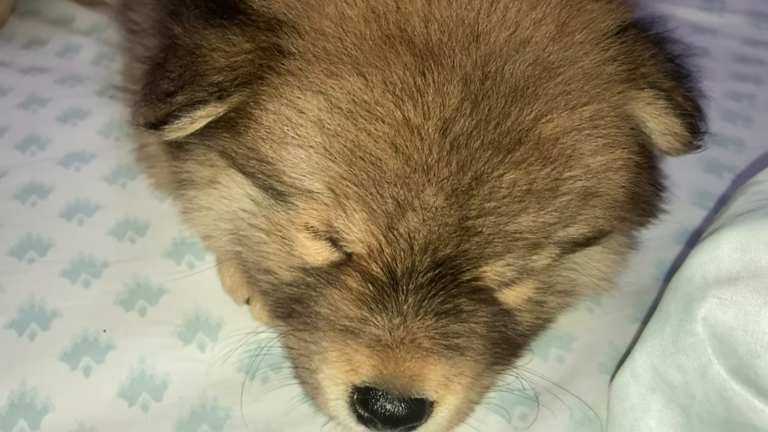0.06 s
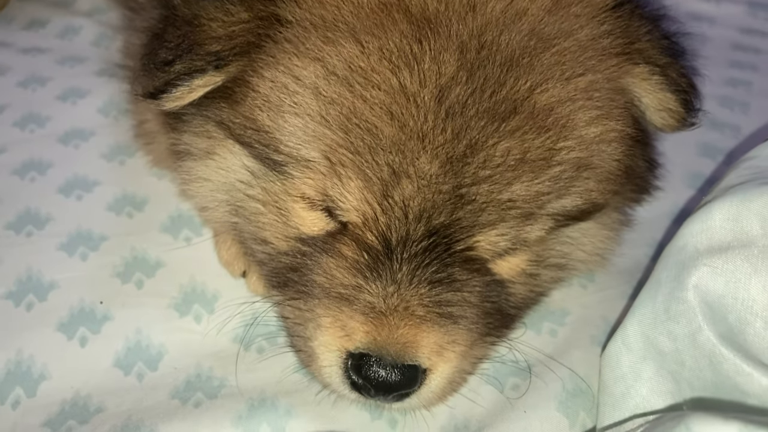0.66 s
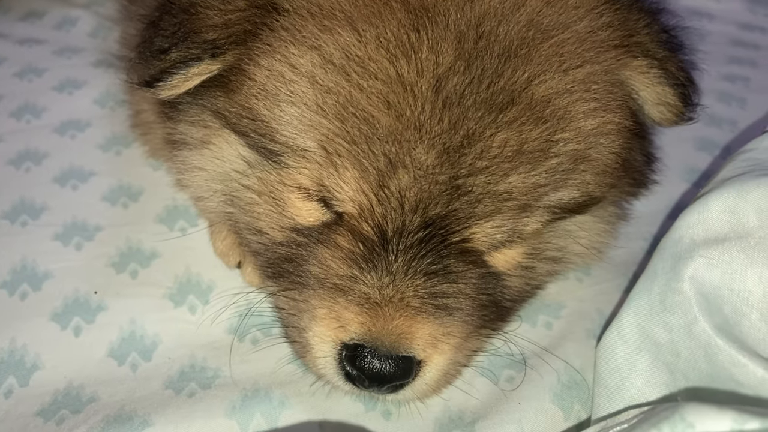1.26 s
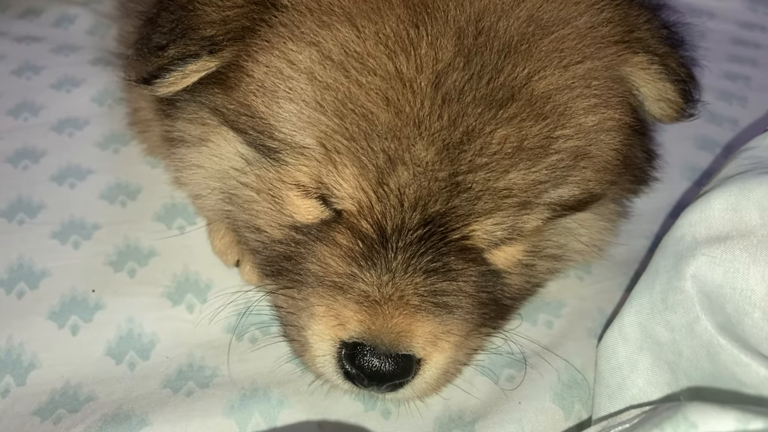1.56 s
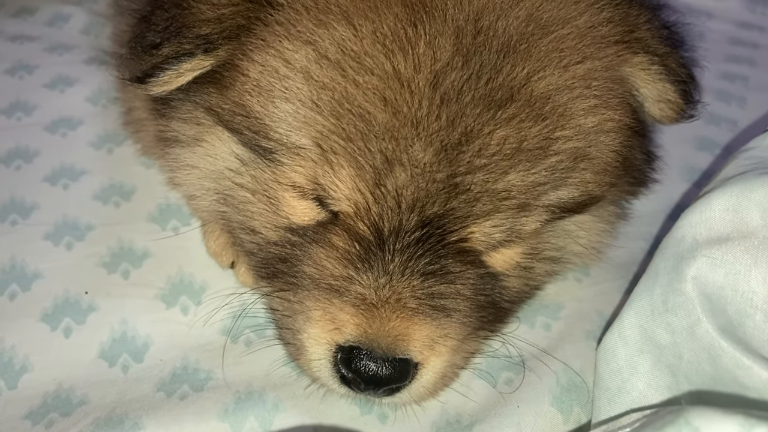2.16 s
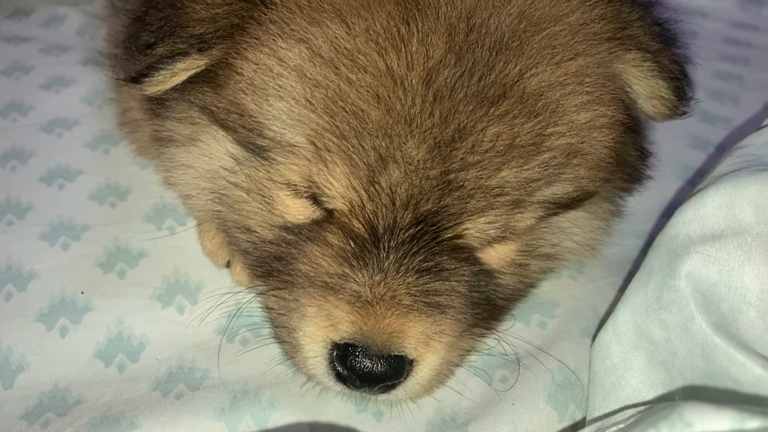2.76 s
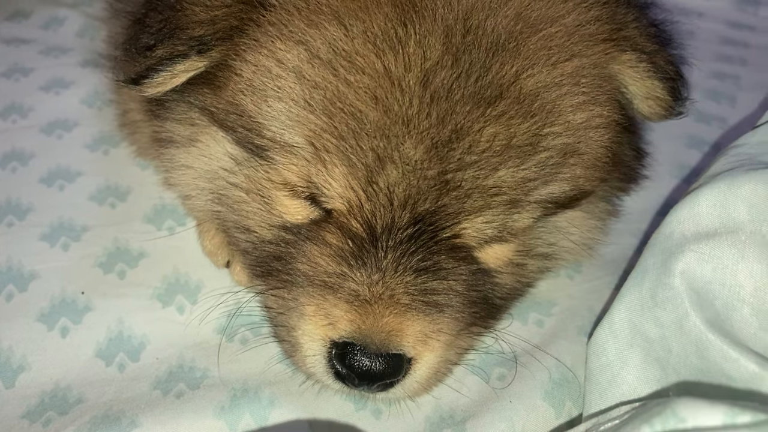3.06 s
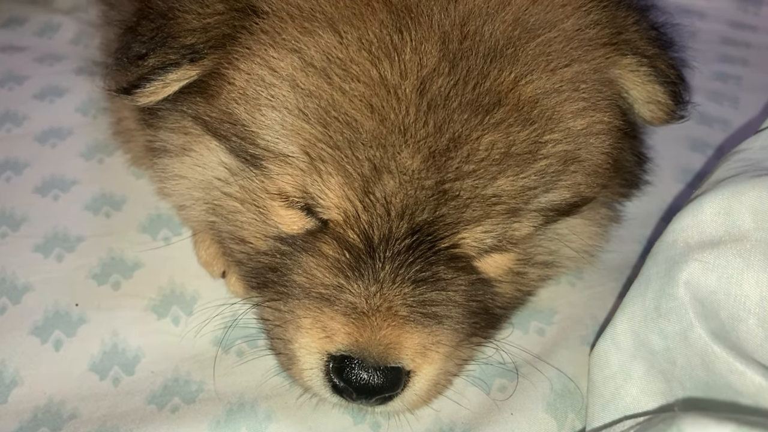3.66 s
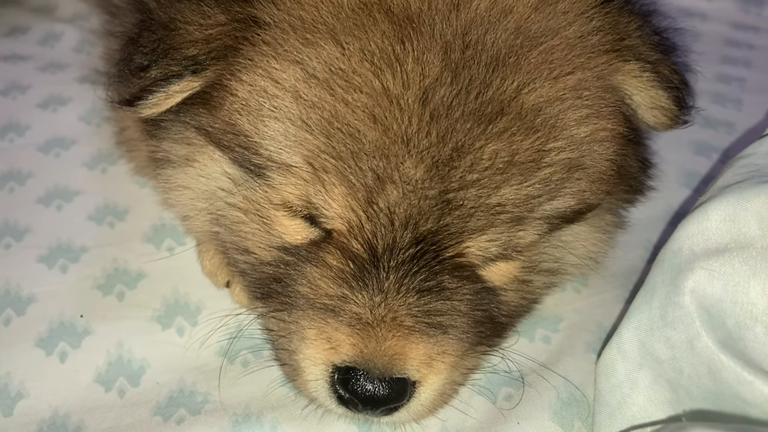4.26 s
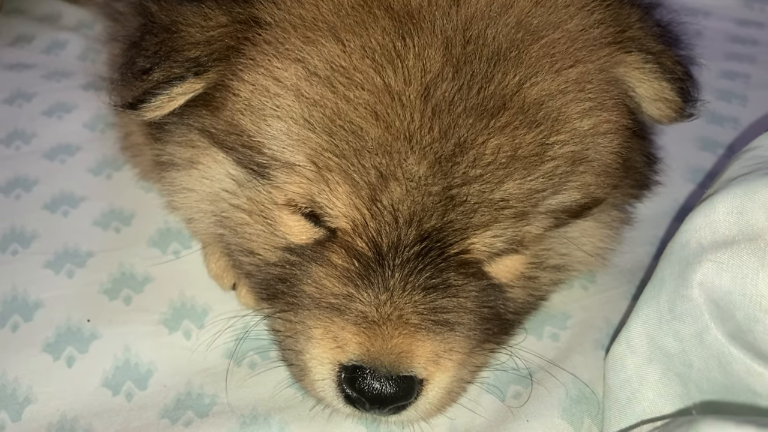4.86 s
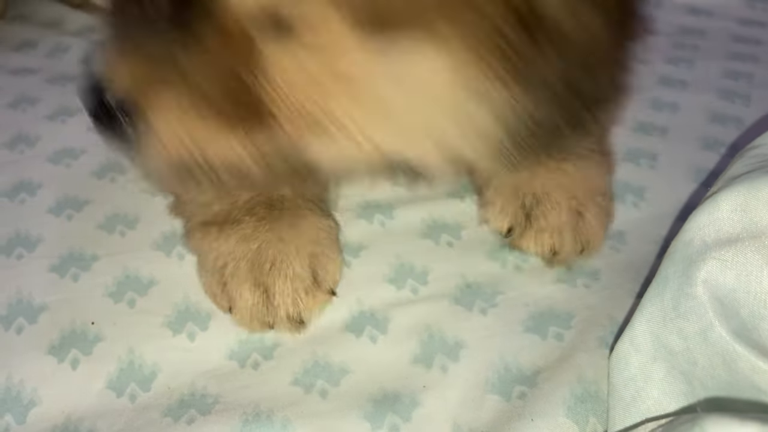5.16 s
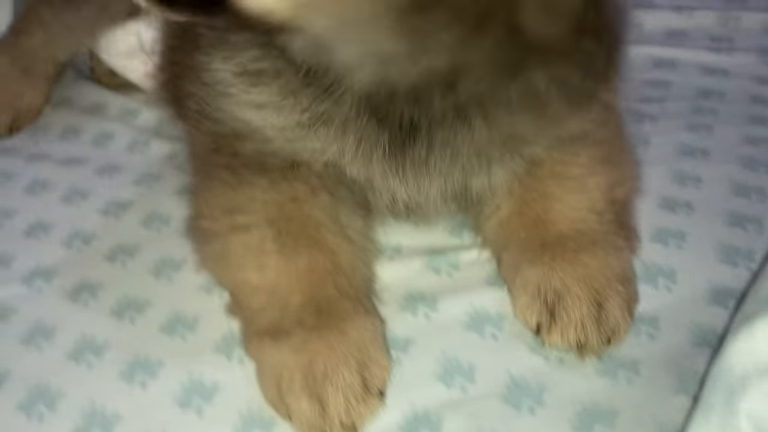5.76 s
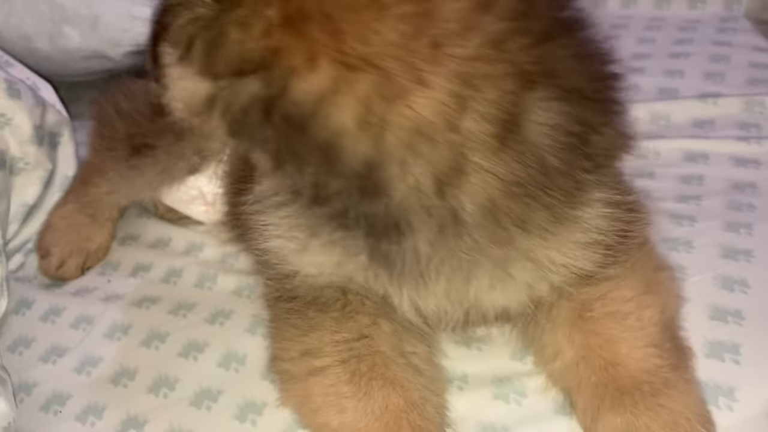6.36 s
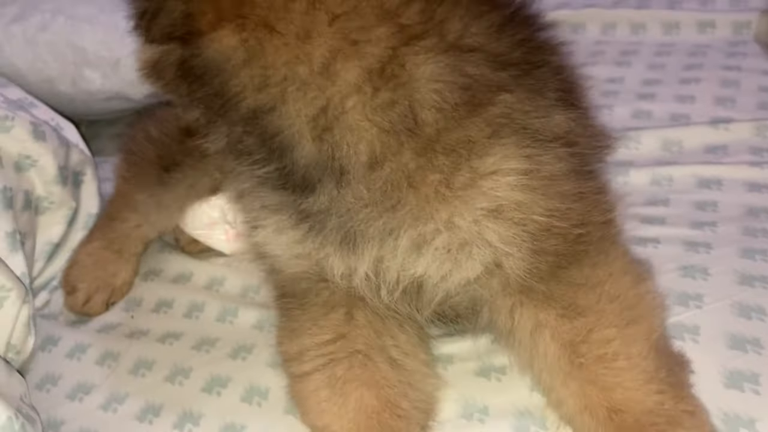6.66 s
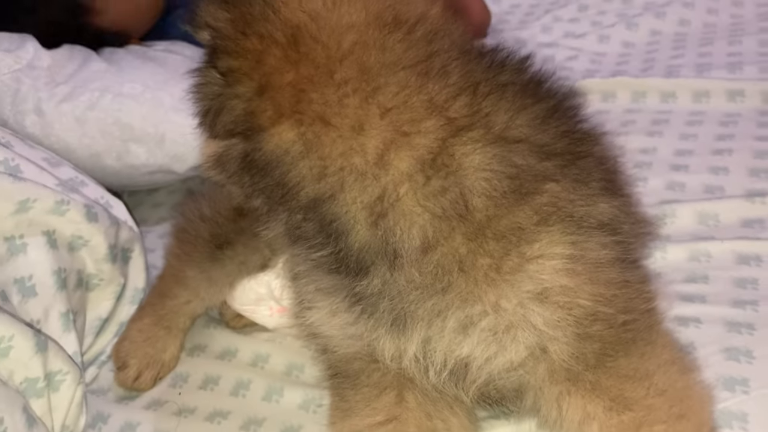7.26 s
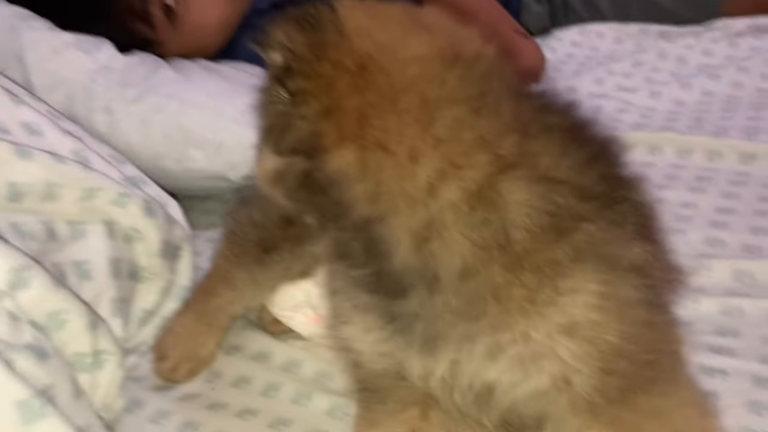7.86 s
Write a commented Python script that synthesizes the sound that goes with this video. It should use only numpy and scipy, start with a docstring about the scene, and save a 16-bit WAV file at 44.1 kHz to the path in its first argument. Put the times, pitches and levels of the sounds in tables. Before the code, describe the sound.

An air conditioner drones low and hisses evenly in a quiet bedroom, with faint ticks, soft bedding rustle and one small click.

```python
"""Air conditioner in a quiet bedroom

Heard from the bed, on a camera's stereo microphone. The compressor turns a little slower than the
mains, so its drone throbs six times a second; the fan adds rumble and even hiss. Faint wet ticks
(perhaps condensate) and one dry click sound over it. Bedding rustles, the camera takes a soft bump
and two dull knocks, and the hiss changes colour as the camera turns."""
import sys
import numpy as np
from scipy import signal
from scipy.fft import rfft, irfft, next_fast_len
from scipy.io import wavfile
from scipy.ndimage import uniform_filter1d, map_coordinates

SR = 44100
rng = np.random.default_rng(int(sys.argv[2]) if len(sys.argv) > 2 else 0)


def bounce(signal):
    """Save signal as a 16-bit WAV file at the path given by the first command-line argument."""
    frames = np.transpose(np.atleast_2d(signal))
    limited = np.clip(frames, -1, 1)
    pcm = np.round(limited * 32767).astype(np.int16)
    wavfile.write(sys.argv[1], SR, pcm)


N = 349227


# The compressor's drone, from the bed: shaft_multiple, mains_multiple, level_db
DRONE_LINES = [(2, 0, -49), (0, 2, -51.5), (3, 0, -48), (1, 2, -42.5), (4, 0, -59.5), (2, 2, -62.5),
               (0, 4, -52.5), (11, 0, -71), (12, 0, -71), (13, 0, -71), (14, 0, -66.5), (15, 0, -74),
               (16, 0, -71.5), (21, 0, -72.5), (27, 0, -74), (28, 0, -78)]
# The casing's once-a-turn shake: time_s, level_db
CASING_SHAKE = [(0.0, -42.5), (0.42, -40.5), (0.77, -44), (1.26, -40), (1.61, -45.5), (2.31, -40),
                (2.8, -49.5), (3.15, -42.5), (4.06, -43), (5.6, -43), (5.95, -41), (6.3, -46.5),
                (6.58, -42), (6.86, -42), (7.07, -57), (7.14, -44), (7.49, -39.5), (7.91, -49.5)]
def compressor(shaft_hz=57.005, mains_hz=60, drift_rad=0.05, wander_db=0.5, flutter_db=0.5):
    """Shaft harmonics and magnetic hum lie 6 Hz apart and beat, over the low shake of the casing."""
    slip = drift_rad * wobble(1.22)  # the shaft angle wanders with the load
    casing_phase = rng.uniform(0, 2 * np.pi, size=64)  # lines that beat together share a phase
    drone = amp(curve(CASING_SHAKE) + wander_db * wobble(8.4)) * tone(shaft_hz, slip)
    for shaft, mains, db in DRONE_LINES:
        hz = shaft * shaft_hz + mains * mains_hz
        phase = shaft * slip + casing_phase[round(shaft + mains)]
        drone += amp(db + flutter_db * wobble(3.44)) * tone(hz, phase)
    return drone


# Low rumble of the fan, from the bed: frequency_hz, density_db
RUMBLE_SPECTRUM = [(20, -35), (36, -21), (52, -11), (64, 0.5), (80, -6.5), (104, -7), (125, -3),
                   (137, -11.5), (148, -8), (154, 1), (175, -2), (200, -3.5), (218, -2), (252, -8),
                   (285, -5), (300, -8.5), (370, -11.5), (520, -20.5), (1000, -58)]
# Even hiss as one hears it, with a dip near 5600 Hz: frequency_hz, density_db
HISS_SPECTRUM = [(200, -39), (450, 0), (660, 0.5), (790, -1), (1500, -2), (1700, -5.5), (2000, -7.5),
                 (3100, -16.5), (3600, -18), (4900, -22), (5600, -30), (6800, -18), (7800, -25),
                 (9300, -22.5), (10800, -26), (12000, -45), (16000, -36)]
# Resonances of the duct and of the casing panels: centre_hz, width_hz, lift_db
DUCT_MODES = [(419.4, 35, 8), (498, 14, 4), (559, 13, 5.5), (623, 53, 4), (703, 36, 4), (955, 37, 5.5),
              (2660, 280, 2), (3830, 180, 7), (4110, 130, 6), (4550, 290, 5.5), (6140, 930, 5),
              (8380, 380, 8)]
PANEL_MODES = [(75.5, 3, 4), (87, 2.8, 2.5), (110.6, 5, 8), (189.4, 2.4, 6.5), (208.5, 5, 4.5),
               (271.2, 7.7, 6.5), (315.2, 10, 6.5)]
# Change in the hiss with the microphone turned: frequency_hz, gain_db
TURNED_COLOUR = [(350, 0.5), (580, -3), (930, 1.5), (1100, 2), (1400, 1), (2000, 0.5), (4500, 3), (9000, 1)]
# Faint wavering tones of the fan: pitch_hz, level_db
FAN_TONES = [(96.7, -64.5), (143.7, -57.5), (182.3, -63), (273.8, -61.5), (314.7, -64.5), (964, -73),
             (1195, -71.8), (2385, -77), (3798, -75)]
def fan(rumble_db=-43.5, hiss_db=-50, waver_rad=0.58, turn_start_s=5.43, turn_length_s=0.62):
    """Air rumbles in the panels and hisses through the duct; the hiss shifts as the microphone turns."""
    def lift(modes, hz):
        return sum(db / (1 + (2 * (hz - centre) / width) ** 2) for centre, width, db in modes)

    rumble = air_noise(lambda hz: amp(along(RUMBLE_SPECTRUM, hz)
                                      + lift(DUCT_MODES, hz) + lift(PANEL_MODES, hz)))
    even_hiss = air_noise(lambda hz: amp(along(HISS_SPECTRUM, hz) + lift(DUCT_MODES, hz)))
    hiss = amp(hiss_db) * eddies(even_hiss, depth_db=1.68)
    turned_hiss = filtered(hiss, lambda hz: amp(along(TURNED_COLOUR, hz)))
    turn = curve([(turn_start_s, 0), (turn_start_s + turn_length_s, 1)])
    tones = sum(amp(db) * tone(hz, waver_rad * wobble(3)) for hz, db in FAN_TONES)
    return amp(rumble_db) * rumble + (1 - turn) * hiss + turn * turned_hiss + tones


def eddies(air, depth_db):
    """Turbulence lifts and lowers small patches of time and frequency."""
    spectra = signal.stft(air, nperseg=512)[2]
    patches = uniform_filter1d(rng.standard_normal(spectra.shape[1:]), size=4, axis=0)
    patches = uniform_filter1d(patches, size=9, axis=1)
    stirred = spectra * amp(depth_db * unit(patches))
    return unit(signal.istft(stirred, nperseg=512)[1][:, :N])


# The tray's short ring and its lingering note: pitch_hz, width_hz, level_db
TRAY_MODES = [(2164, 290, -0.5), (2420, 130, -0.5), (2880, 290, -3), (3720, 600, -8)]
TRAY_NOTE = [(2365, 62, -1), (3460, 70, -17)]
# The crisp edge of every pop: frequency_hz, density_db
EDGE_SPECTRUM = [(1000, -20), (3000, 2), (4600, 2), (6000, -7), (11000, -9), (13500, -9), (16000, -26)]
# Wet ticks, from the bed; note, spray and edge are relative to the ring:
# start_s, level_db, length_s, pitch_factor, damping_factor, note_db, spray_db, spray_hz, edge_db
WET_TICKS = [(2.331, -61.5, 0.027, 0.93, 2.5, -20, 4, 9300, -11),
             (2.598, -50.5, 0.016, 0.79, 1.3, -18, -19, 8500, -25),
             (2.776, -47.5, 0.024, 1, 1.8, 0, -11, 7400, -16),
             (3.052, -53, 0.013, 1.1, 1.2, -18, -20, 8500, -19),
             (3.299, -54, 0.018, 0.87, 1.5, -9, -20, 8500, -19),
             (3.465, -47.5, 0.021, 0.94, 0.86, -2, -14.5, 7500, -12),
             (3.974, -46, 0.021, 0.88, 3.1, -12, -18, 8500, -20),
             (4.456, -52, 0.016, 0.91, 2.8, -16, -9, 8500, -13),
             (4.856, -46.5, 0.024, 1.05, 2, -14, -17, 8900, -20),
             (5.196, -56, 0.02, 0.97, 3, -18, -15, 9000, -13),
             (5.568, -53, 0.018, 0.96, 3, -18, -13, 8800, -14),
             (6.077, -53, 0.021, 1.1, 2.6, -18, -13, 9900, -17),
             (6.344, -57, 0.032, 0.97, 1.5, -18, -21, 9000, -16),
             (6.567, -49, .022, 1.08, 2, -18, -22, 9000, -19)]
def wet_ticks(pop_rate_hz=210, pop_s=0.0038, swell_s=0.004, spray_width_hz=1150, spray_t60_s=0.26):
    """Each tick is a quick run of tiny pops; every pop rings the tray and throws a little spray."""
    rings, sprays = np.zeros((2, N + SR)), np.zeros((2, N))
    t = np.arange(SR // 2) / SR
    edge = air_noise(lambda hz: amp(along(EDGE_SPECTRUM, hz)))
    for start, db, length, pitch, damping, note_db, spray_db, spray_hz, edge_db in WET_TICKS:
        jitter, size_db = rng.standard_normal((2, 10))
        pop_times = np.abs(np.arange(10) + 0.12 * jitter) / pop_rate_hz
        swell = 1 - 0.5 * np.exp(-pop_times / swell_s)
        sizes = amp(-size_db) * swell * np.exp(-(pop_times / length) ** 2)
        pops = np.bincount(np.round(pop_times * SR).astype(int), sizes, len(t))

        struck = lambda response: unit(bedroom(signal.fftconvolve(pops, response)[:len(t)]))
        ring = struck(ringing(TRAY_MODES, t, pitch, damping))
        note = amp(note_db) * struck(ringing(TRAY_NOTE, t))
        gain = amp(db) * np.sqrt(length / t[-1])  # the level holds over the length of the tick
        rings[:, round(start * SR):][:, :len(t)] += gain * unit(ring + note)

        age = np.maximum(t[:, None] - pop_times, 0)
        puffs = ((age > 0) * np.exp(-age / pop_s)) @ sizes
        tail = amp(-13 - 60 * t / spray_t60_s)
        envelope = np.interp(np.arange(N) / SR - start, t, unit(np.hypot(puffs, tail)), 0, 0)
        spray = noise_band(spray_hz, spray_width_hz)
        sprays += gain * envelope * (amp(spray_db) * spray + amp(edge_db) * edge)
    return filtered(rings[:, :N], ports) + sprays


# The ring of the dry click: pitch_hz, width_hz, level_db
CLICK_MODES = [(1900, 700, -7), (2930, 560, 4), (4080, 600, -3), (6250, 520, -5.5), (9400, 1700, -17)]
def panel_click(start_s=6.786, gain_db=-27, slip_lead_s=0.0006, slip_db=-11):
    """One dry snap, as of a plastic panel settling: it slips, then lets go, with a faint room tail."""
    age = np.arange(N) / SR - start_s
    slip = amp(slip_db) * ringing(CLICK_MODES[2:], np.maximum(age + slip_lead_s, 0))
    snap = ringing(CLICK_MODES, np.maximum(age, 0))
    heard = bedroom(slip + snap, near_db=-11, near_t60_s=0.02, tail_db=-7, tail_t60_s=0.22)
    return amp(gain_db) * filtered(heard, ports)


# The hiss of sliding cloth: frequency_hz, density_db
CLOTH_SPECTRUM = [(1000, -5), (3000, -7), (7000, 2.5), (9500, 4), (12000, -3.5), (16000, -0.5)]
# Strokes of cloth on the bed, near the microphone: start_s, peak_db, length_s
CLOTH_STROKES = [(-.1, -61, 0.22), (.12, -62.5, 0.34), (0.417, -65.5, 0.47), (0.677, -61, 0.5),
                 (1.078, -59, 0.14), (1.2, -61, 0.27), (5.008, -64, 0.11), (5.1, -67, 0.2),
                 (6.22, -71, 0.35), (6.46, -60.5, 0.36), (7.1, -64.5, 0.45), (7.882, -53.5, .02)]
def bedding_rustle(peak_share=0.27, sway_db=1.1, grain_db=1.5):
    """Cloth brushes over cloth: each stroke hisses with its speed, grainy as the threads catch."""
    power = np.zeros(N)
    for start, db, length in CLOTH_STROKES:
        ramp = curve([(start, 0), (start + peak_share * length, 1), (start + length, 0)])
        speed = np.sin(np.pi / 2 * ramp)
        power += (amp(db) * speed) ** 2
    texture = amp(sway_db * wobble(25)) * unit(amp(grain_db * wobble(400)))
    return np.sqrt(power) * texture * air_noise(lambda hz: amp(along(CLOTH_SPECTRUM, hz)))


# Muffled rubs on the bed: start_s, peak_db, length_s, centre_hz, width_hz
BEDDING_RUBS = [(1.38, -60.5, .22, 2460, 600), (2.72, -54, .24, 575, 50)]
def bedding_rubs():
    """Soft rubs in the bedding swell and fade, each in one band of noise."""
    swell = lambda start, length: np.sin(np.pi * curve([(start, 0), (start + length, 1)]))
    return sum(amp(db) * swell(start, length) * noise_band(centre, width)
               for start, db, length, centre, width in BEDDING_RUBS)


# Handling noise right at the microphone, just before it turns: start_s, peak_db, pitch_hz
GRIP_KNOCKS = [(5.1116, -33, 660), (5.1725, -39, 644)]
def grip_knocks(t60_s=0.012):
    """The hand shifts on the camera: dull knocks that die at once."""
    knocks = np.zeros(N)
    for start, db, hz in GRIP_KNOCKS:
        age = np.maximum(np.arange(N) / SR - start, 0)
        knocks += amp(db - 60 * age / t60_s) * np.sin(2 * np.pi * hz * age)
    return knocks


def finger_bump(centre_s=3.418, pitch_hz=116, width_s=0.0076, left_db=-17, right_db=-38):
    """A finger nudges the camera beside the left microphone port: one low push and pull."""
    t = np.arange(N) / SR - centre_s
    push = np.sin(2 * np.pi * pitch_hz * t) * np.exp(-(t / width_s) ** 2)
    return amp([[left_db], [right_db]]) * push


def bedroom(x, near_db=-1, near_t60_s=0.045, tail_db=-3, tail_t60_s=0.27):
    """A short sound reaches both ports with scatter from nearby furniture and the room's tail."""
    t = np.arange(len(x)) / SR

    def echoes(db, t60_s):
        decay = rng.standard_normal((2, len(t))) * amp(-60 * t / t60_s)
        return amp(db) * unit(decay) / np.sqrt(len(t))

    room = echoes(near_db, near_t60_s) + echoes(tail_db, tail_t60_s)
    return x + signal.fftconvolve(x[None], room, axes=1)[:, :len(t)]


# Balance of the two microphone ports: frequency_hz, left_minus_right_db
PORT_BALANCE = [(60, 2.5), (110, 3.5), (200, 1.5), (380, 3.5), (700, 1), (1290, -3), (2380, 0),
                (4400, -0.5), (8120, 0.5), (15000, -0.5)]
# Phase between the ports: frequency_hz, left_lead_rad
PORT_LEAD = [(100, 0), (320, -.15), (440, -1), (1000, -1.25), (1700, -.2), (2200, 1), (3200, 2.4),
             (4200, 2.5), (5500, 3.14), (7000, 4.8), (8400, 6.28), (11600, 9.4), (15000, 13)]
def ports(hz):
    """Gain and phase at the left and right microphone port for sound from the air conditioner."""
    left = amp(along(PORT_BALANCE, hz) / 2) * np.exp(0.5j * along(PORT_LEAD, hz))
    return np.array([left, 1 / left])


# How alike the ports hear noise in the room, from 0 to 1: frequency_hz, coherence
PORT_COHERENCE = [(60, .96), (250, .98), (430, .9), (800, .86), (1150, .58), (1500, .68), (2800, .47),
                  (4000, .5), (5400, .94), (8300, .94), (14000, .82)]
def air_noise(colour):
    """Stereo noise of rms 1: a direct part common to both ports and a diffuse part."""
    size = next_fast_len(N, True)
    hz = np.fft.rfftfreq(size, 1 / SR)
    spread = np.arccos(np.clip(along(PORT_COHERENCE, hz), 0, 1)) / 2
    white = rng.standard_normal((2, len(hz))) + 1j * rng.standard_normal((2, len(hz)))
    common, diffuse = white * colour(hz) * np.array([np.cos(spread), np.sin(spread)])
    spectrum = np.array([common + diffuse, common - diffuse]) * ports(hz)
    return unit(irfft(spectrum, size)[:, :N])


def noise_band(centre_hz, width_hz):
    """Stereo noise in one bell-shaped band."""
    return air_noise(lambda hz: np.exp(-((hz - centre_hz) / width_hz) ** 2 / 2))


def tone(hz, phase, in_step_s=4.085):
    """A sine at both ports, rms about 1; tones given the same phase line up at in_step_s."""
    t = np.arange(N) / SR - in_step_s
    return np.sqrt(2) * np.real(ports(hz)[:, None] * np.exp(1j * (2 * np.pi * hz * t + phase)))


def ringing(modes, t, pitch=1, damping=1):
    """Damped sines of alternating sign after one blow at t = 0; wider modes die sooner."""
    return sum((-1) ** k * amp(db) * np.sin(2 * np.pi * pitch * hz * t)
               * np.exp(-np.pi * damping * width * t) for k, (hz, width, db) in enumerate(modes))


def amp(db):
    """Decibels to gain."""
    return 10 ** (np.asarray(db) / 20)


def unit(x):
    """x at rms 1."""
    return x / np.sqrt(np.mean(x ** 2) + 1e-20)


def along(points, hz):
    """(frequency_hz, value) points read on a log axis."""
    frequencies, values = np.transpose(points)
    return np.interp(np.log(hz + 1), np.log(frequencies + 1), values)


def curve(rows):
    """(time_s, value) rows as one value per sample."""
    return np.interp(np.arange(N) / SR, *np.transpose(rows))


def wobble(rate):
    """A smooth random curve, rate knots a second."""
    knots = rng.standard_normal(int(N * rate / SR) + 4)
    return map_coordinates(knots, [np.arange(N) * rate / SR])


def filtered(x, response):
    """x through a complex frequency response."""
    size = next_fast_len(N + SR // 2)
    return irfft(rfft(x, size) * response(np.fft.rfftfreq(size, 1 / SR)), size)[..., :N]


def scene():
    """The air conditioner and the small sounds around it, from the bed."""
    machine = compressor() + fan()
    bedding = bedding_rustle() + bedding_rubs()
    return machine + bedding + wet_ticks() + panel_click() + grip_knocks() + finger_bump()


def record(dry):
    """The camera keeps nothing above its band limit."""
    limit_hz = 15750
    return filtered(dry, lambda hz: hz < limit_hz)


dry = scene()
out = record(dry)
bounce(out)
```